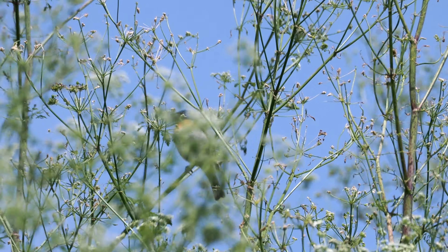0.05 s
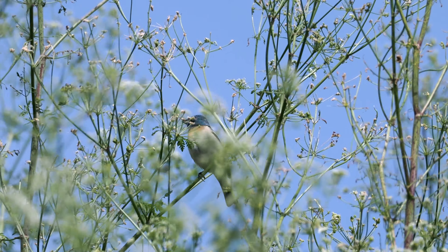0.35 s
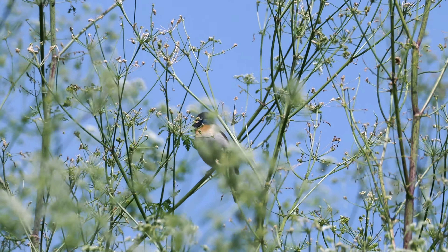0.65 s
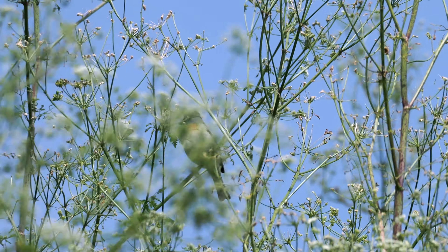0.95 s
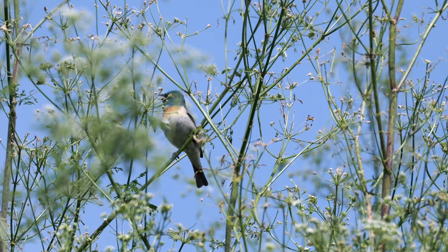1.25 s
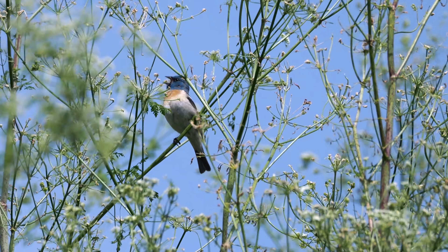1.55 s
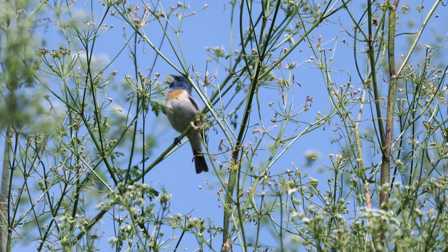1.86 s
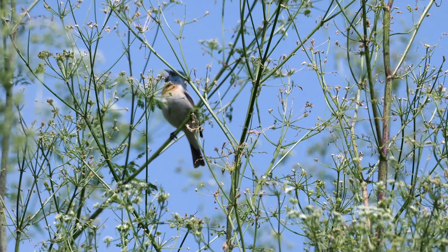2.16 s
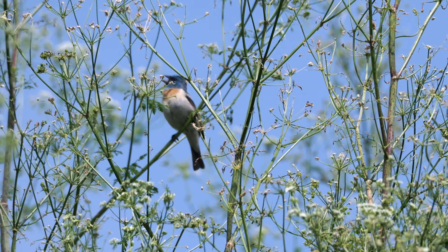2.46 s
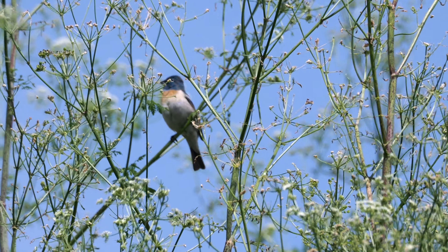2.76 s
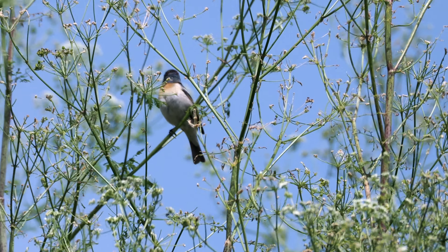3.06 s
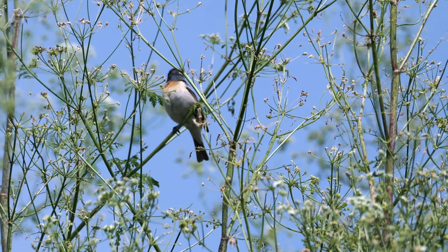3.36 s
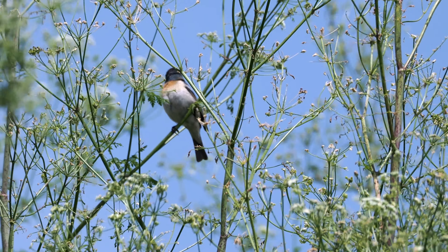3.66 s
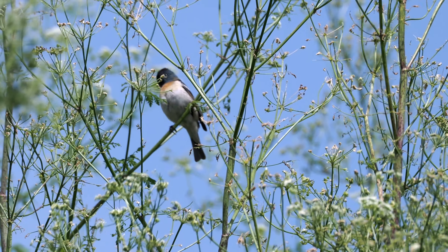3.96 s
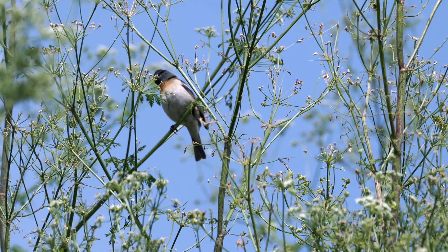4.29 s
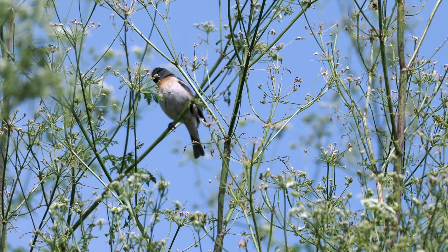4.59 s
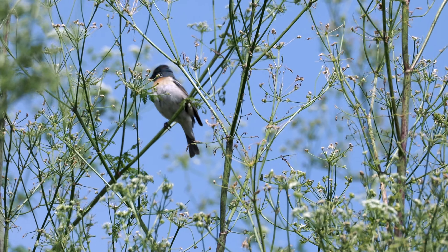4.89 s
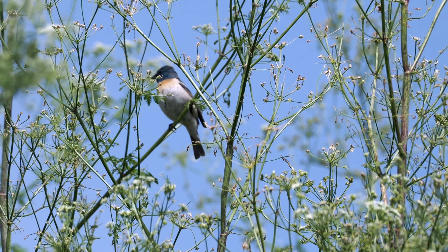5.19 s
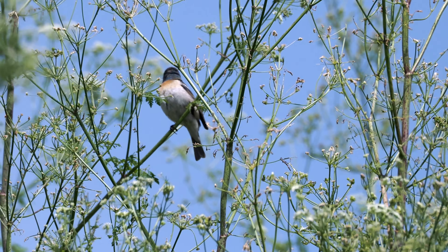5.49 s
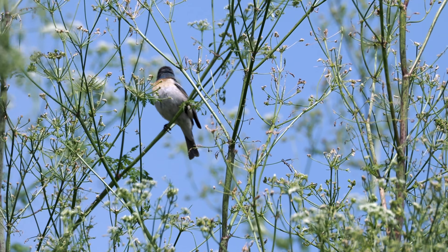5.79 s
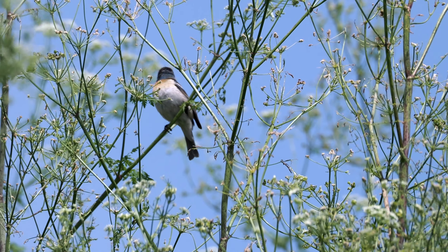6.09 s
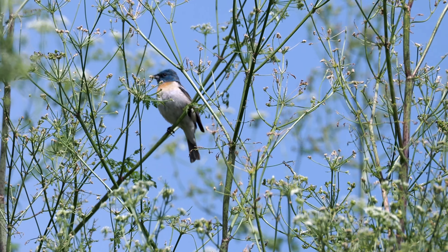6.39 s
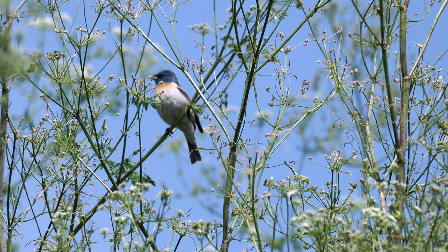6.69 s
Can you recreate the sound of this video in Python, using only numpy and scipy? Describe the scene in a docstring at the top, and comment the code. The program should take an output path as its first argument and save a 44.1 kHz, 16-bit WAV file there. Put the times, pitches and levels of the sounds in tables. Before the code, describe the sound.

Light wind rumbles on the microphone in an open, weedy place, with faint traffic and an engine humming far away. Thin distant bird whistles and a sharp chip lead into a nearby songbird's bright run of slurred notes, closed by a buzz and a brief rattle. Another chip, a few soft dry ticks and a dull distant thud follow. Faint birds keep calling as the wind gusts at the end.

```python
"""Bunting in tall weeds

A bunting's syrinx whistles paired slurs and arches, then a buzz and a short rattle. Other small birds
chip, whistle and trill further off; the stems scatter the notes. Faint dry ticks fall in and after the song.
Behind lie distant traffic, an engine's hum and one far thud. Light wind rumbles on the microphones
and gusts hardest at the end."""
import sys
import numpy as np
from scipy import signal
from scipy.fft import rfft, irfft, next_fast_len
from scipy.io import wavfile
from scipy.ndimage import uniform_filter1d

SR = 44100
rng = np.random.default_rng(int(sys.argv[2]) if len(sys.argv) > 2 else 0)


def transcribe(u):
    """Save the signal u as a 16-bit wav file named by the first command-line argument.

    u: samples, shape (n,) or (channels, n), limited to [-1, 1]; the rate is SR.
    q: integer samples, one column per channel.
    """
    v = np.clip(np.atleast_2d(u).T, -1, 1)
    q = np.round(v * 32767).astype(np.int16)
    wavfile.write(sys.argv[1], SR, q)


N = 297234
T = np.arange(N) / SR
FFT_SIZE = next_fast_len(N, True)
FREQS = np.fft.rfftfreq(FFT_SIZE, 1 / SR)


def undb(db):
    """Decibels to gain."""
    return 10 ** (np.asarray(db) / 20)


def curve(rows, x):
    """Two-column table, interpolated linearly at x."""
    return np.interp(x, *np.transpose(rows))


def unit(x):
    """Scale to rms 1."""
    return x / np.sqrt(np.mean(x ** 2))


def filtered(x, gain):
    """Apply a gain per frequency."""
    return irfft(rfft(x, FFT_SIZE) * gain, FFT_SIZE)[..., :N]


def colour(x, spectrum):
    """Filter by rows of f/Hz, gain/dB."""
    hz, db = np.transpose(spectrum)
    return filtered(x, undb(np.interp(np.log(FREQS + 1), np.log(hz), db)))


def noise(spectrum, channels=2):
    """Independent noises of one colour, rms 1."""
    return unit(colour(rng.standard_normal((channels, N)), spectrum))


def narrow(hz, width_hz, channels=1):
    """Gaussian band of noise, rms 1."""
    band = np.exp(-((FREQS - hz) / width_hz) ** 2 / 2)
    return unit(filtered(rng.standard_normal((channels, N)), band))


def walk(rate_hz):
    """Slow random drift, rms 1."""
    hold = int(SR / rate_hz)
    steps = np.repeat(rng.standard_normal(N // hold + 1), hold)
    return unit(uniform_filter1d(uniform_filter1d(steps, hold), hold)[:N])


def jitter(n, smooth_samples):
    """Fast random flutter, rms 1."""
    return unit(uniform_filter1d(rng.standard_normal(n), smooth_samples))


def pan(db):
    """Stereo gains for a left-minus-right level."""
    return undb(np.array([[1], [-1]]) * db / 2)


def add(track, start_s, x):
    """Mix x into track at start_s."""
    i = int(start_s * SR)
    track[..., i:i + x.shape[-1]] += x[..., :max(N - i, 0)]


def scatter(x, t60_s, db):
    """Dense weak echoes off stems and leaves, different at each microphone."""
    t = np.arange(SR // 2) / SR
    build_up = 1 - np.exp(-t / .0012)
    echoes = rng.standard_normal((2, len(t))) * np.exp(-np.log(1000) * t / t60_s) * build_up
    echoes /= np.sqrt(np.sum(echoes ** 2, axis=1, keepdims=True))
    return undb(db) * signal.fftconvolve(np.atleast_2d(x), echoes, axes=1)[:, :N]


# traffic, leaves and hiss: f/Hz, relative density/dB
AIR_SPECTRUM = [(30, 5.5), (110, 1.5), (250, -1), (390, -0.5), (500, -5), (1100, -6), (1450, -10.5),
                (1850, -22), (2300, -19.5), (2950, -17), (4200, -26.5), (8000, -27.5), (11300, -31.5),
                (15000, -31)]
# stereo width: f/Hz, side minus mid/dB
AIR_WIDTH = [(60, -41), (160, -12), (380, -8.5), (1300, -5), (2400, 1), (15000, 0.5)]
# traffic drone: f/Hz, width/Hz, rms level/dB
DRONE_BANDS = [(263.5, 7.6, -71.5), (386.2, 12.7, -68.5), (685, 80, -68), (1006, 20, -70.5)]


def traffic_and_leaves(mid_db=-54):
    """Far traffic and leaves: centred lows, wide hiss, a faint tonal drone."""
    mid, side = noise(AIR_SPECTRUM)
    side = colour(side, AIR_WIDTH)
    drone = sum(undb(db) * narrow(hz, width_hz) for hz, width_hz, db in DRONE_BANDS)
    return undb(mid_db) * np.array([mid + side, mid - side]) + drone


# engine hum: f/Hz, rms level/dB
ENGINE_LINES = [(129.5, -64), (157.7, -58.5)]


def engine(drift=0.00408, flutter_db=1.63):
    """Two low lines of a far engine, wavering on their way through the air."""
    hum = np.zeros(N)
    for hz, db in ENGINE_LINES:
        amplitude = np.sqrt(2) * undb(db + flutter_db * walk(8.3))
        phase = 2 * np.pi * np.cumsum(hz * (1 + drift * walk(9))) / SR
        hum += amplitude * np.sin(phase)
    return hum


# breeze: t/s, level/dB
BREEZE_LEVELS = [(0, -57), (.8, -57), (2, -62.5), (3.8, -65), (4.6, -53.5), (5.8, -57.5), (6.7, -56)]
# gusts: peak t/s, length/s, level/dB, L-R/dB
WIND_GUSTS = [(0.053, .08, -42, 4), (.21, 0.15, -45.5, 7.5), (.86, .06, -49.5, -3),
              (1.06, 0.067, -54.5, 19), (1.48, .07, -52, 8), (4.5, .06, -46, 16), (5.25, 0.063, -48.5, 16),
              (6.04, 0.049, -51, -12), (6.504, 0.12, -42.5, 14.5), (6.668, 0.058, -37, 21)]
# buffeting: f/Hz, relative density/dB
WIND_SPECTRUM = [(8, -18), (20, 8.5), (35, 9.5), (55, -18.5), (120, -10), (300, -50), (2000, -95)]


def wind():
    """Eddies buffet each microphone separately: a light breeze plus brief gusts."""
    power = undb(curve(BREEZE_LEVELS, T)) ** 2
    for peak_s, length_s, db, pan_db in WIND_GUSTS:
        bell = np.exp(-(2 * (T - peak_s) / length_s) ** 2)
        power = power + (undb(db) * pan(pan_db)) ** 2 * bell
    return noise(WIND_SPECTRUM) * np.sqrt(power)


# overtones: f/Hz, level re fundamental/dB
SYRINX_OVERTONES = [(7000, -31.5), (9000, -38), (11000, -29.5), (12500, -28.5), (14000, -26), (15500, -31)]


def syrinx(hz, db, harsh_db=0, waver=0.012, rasp_rad=0.45):
    """A bird's voice: a nearly pure, wavering tone with weak, raspy overtones."""
    wavering_hz = hz * (1 + waver * jitter(len(hz), 60))
    phase = 2 * np.pi * np.cumsum(wavering_hz) / SR
    rasp = rasp_rad * jitter(len(hz), 30)
    tone = np.sin(phase)
    for k in (2, 3):
        gain = undb(curve(SYRINX_OVERTONES, k * hz) + harsh_db) * (k * hz < SR / 2)
        tone += gain * np.sin(k * phase + rasp)
    return tone * undb(db) * signal.windows.tukey(len(hz), .08)


def swell_db(t, attack_s, release_s, depth_db=15.5):
    """Attack, hold and release of a note."""
    attack = np.maximum(1 - t / attack_s, 0)
    release = np.maximum(1 - (t[-1] - t) / release_s, 0)
    return -depth_db * (attack + release)


def calls(rows, settle, attack_share, release_share, harsh_db=0, waver=0.012):
    """Simple calls: the pitch leaves its start quickly and settles on its end."""
    track = np.zeros((2, N))
    for start_s, length_s, start_hz, end_hz, db, pan_db in rows:
        t = np.arange(int(length_s * SR)) / SR
        to_go = (np.exp(-settle * t / length_s) - np.exp(-settle)) / (1 - np.exp(-settle))
        hz = end_hz + (start_hz - end_hz) * to_go
        level_db = db + swell_db(t, attack_share * length_s, release_share * length_s)
        add(track, start_s, pan(pan_db) * syrinx(hz, level_db, harsh_db, waver))
    return track


# thin whistles: t/s, length/s, start f/Hz, end f/Hz, relative level/dB, L-R/dB
WHISTLE_CALLS = [ (.285, 0.055, 8750, 7850, -56.5, 5), (.541, .09, 8500, 7400, -51.5, 0),
                 (.825, 0.073, 8870, 7670, -54.5, 0), (.987, 0.078, 9200, 7880, -58, -2),
                 (1.086, .085, 6170, 5250, -58.5, 0), (4.05, .033, 6950, 7570, -64.5, -8),
                 (4.14, .061, 6500, 7100, -69, -7), (4.265, .046, 6300, 6900, -72, -7),
                 (5.335, .04, 6630, 7300, -69, -3), (5.591, .068, 6700, 7220, -57.5, -7),
                 (5.711, 0.05, 6700, 7000, -55, -6), (5.837, .06, 6530, 7120, -56.5, -5),
                 (5.955, 0.017, 6400, 6900, -61, -5), (6.097, 0.013, 5400, 7150, -59.5, -7),
                 (6.134, 0.014, 6260, 7600, -59, -5), (6.238, 0.014, 5640, 7100, -58, -4),
                 (6.29, .015, 6200, 7400, -64, -3)]


def far_whistles(gain_db=-3):
    """Birds deep in the weeds; much of their sound arrives scattered."""
    direct = calls(WHISTLE_CALLS, settle=3.2, attack_share=0.27, release_share=0.12)
    echoes = scatter(direct, t60_s=0.057, db=-2.5) + scatter(direct, t60_s=0.45, db=-4)
    return undb(gain_db) * (direct + echoes)


# sharp chips: t/s, length/s, start f/Hz, end f/Hz, level/dB, L-R/dB
CHIP_CALLS = [(.7275, 0.0084, 11100, 5550, -27, 2), (2.8810, .013, 10550, 6060, -28, 6)]


def chips():
    """A nearby bird's harsh downward sweeps, echoed by the stems."""
    direct = calls(CHIP_CALLS, settle=2.13, attack_share=0.57, release_share=0.5, harsh_db=9, waver=0.0087)
    return direct + scatter(direct, t60_s=.07, db=-2.5) + scatter(direct, t60_s=0.21, db=-7)


# trill: t/s, level/dB
TRILL_LEVELS = [(1.16, -83), (1.2, -68), (1.45, -65), (1.72, -66.5), (1.88, -80)]


def trill(flicker_db=0.3):
    """A distant thin trill, smeared by the thicket into a narrow band."""
    times_s, db = np.transpose(TRILL_LEVELS)
    envelope = np.interp(T, times_s, undb(db), left=0, right=0)
    return narrow(hz=7224, width_hz=270, channels=2) * envelope * undb(flicker_db * walk(70))


# gestures by name: attack/s, release/s, pitch path of (t/s, f/Hz)
GESTURES = { "hook": (0.024, 0.0065, [(0, 5360), (.02, 4800), (.041, 3680)]),
            "flick": (0.0026, 0.0063, [(0, 6120), (.004, 5360), (.012, 4060)]),
            "slur": (0.013, 0.011, [(0, 7520), (.011, 7360), (.057, 5450)]),
            "dip": (0.0015, 0.011, [(0, 7550), (.005, 4970), (.012, 3940), (.06, 3420), (.077, 2770)]),
            "arch": (0.008, 0.011, [(0, 2920), (.01, 4190), (.038, 5410), (.05, 5535), (.063, 5450),
            (.092, 4880)]), "wave": (0.01, 0.013, [(0, 4330), (.016, 4420), (.031, 5300), (.052, 5590),
            (.074, 4900), (.09, 4970)]), "tick": (0.016, 0.01, [(0, 5600), (.007, 8430), (.014, 7280),
            (.022, 6450), (.03, 6400)]), "bow": (0.042, 0.012, [(0, 3890), (.013, 3560), (.042, 4050),
            (.06, 5470), (.071, 5620), (.081, 5400), (.094, 4050), (.116, 2946)]),
            "rattle": (0.003, 0.0027, [(0, 3700), (.013, 4630), (.0185, 6260), (.023, 4470), (.03, 2960)]),
            "burr": (.004, 0.0043, [(0, 2600), (.007, 3280), (.017, 2650)]), }
# how loud each pitch of the song arrives at the microphones: f/Hz, gain/dB
LEVEL_BY_PITCH = [(3000, 0.5), (3500, 3), (3950, -5), (4700, 3), (5200, 0), (5550, 1), (6100, -5),
                  (6500, -9), (6900, -0.5), (7500, -11.5)]


def syllable(gesture, pitch_ratio, waver=0.0041, shimmer_db=1.12, sweep_loss_db=12, half_loss_hz_s=240000):
    """One syrinx gesture: muscles round its corners; it weakens while the pitch moves fast."""
    attack_s, release_s, path = GESTURES[gesture]
    t = np.arange(int(path[-1][0] * SR)) / SR
    hz = pitch_ratio * uniform_filter1d(curve(path, t), size=90, mode="nearest")
    sweep_hz_s = np.abs(np.gradient(hz)) * SR
    db = swell_db(t, attack_s, release_s) + curve(LEVEL_BY_PITCH, hz)
    db -= sweep_loss_db * sweep_hz_s / (sweep_hz_s + half_loss_hz_s)
    db += shimmer_db * jitter(len(t), 120)
    return syrinx(hz, db, waver=waver)


# whistled phrase: t/s, gesture, pitch ratio, gain/dB
PHRASE_NOTES = [ (1.233, "hook", 0.98, -56.5), (1.337, "hook", 0.99, -43.5), (1.442, "hook", 0.97, -36.5),
                (1.538, "slur", 0.997, -33.5), (1.634, "hook", 1.01, -32), (1.739, "slur", 1.003, -32.5),
                (1.831, "dip", 0.98, -36), (1.932, "arch", 1, -33.5), (2.056, "dip", 0.982, -35.5),
                (2.166, "wave", 1.011, -34), (2.29, "tick", .994, -25.5), (2.329, "bow", 1, -33)]


def phrase(flick_delay_s=.0415, flick_ratio=.96, flick_db=-4):
    """The bunting's whistled syllables; a quick flick ends each hook."""
    voice = np.zeros(N)
    for start_s, gesture, pitch_ratio, db in PHRASE_NOTES:
        add(voice, start_s, undb(db) * syllable(gesture, pitch_ratio))
        if gesture == "hook":
            flick = syllable("flick", flick_ratio * pitch_ratio)
            add(voice, start_s + flick_delay_s, undb(db + flick_db) * flick)
    return voice


def buzz(start_s=2.5155, scoops=7, rate_hz=96, low_hz=6830, swing_hz=2390, peak_db=-32.5, throb_db=25):
    """Fast scoops of pitch, each loudest at its bottom, swelling and fading as a whole."""
    turns = np.arange(int(scoops / rate_hz * SR)) / SR * rate_hz
    tension = 1 - np.abs(np.sin(np.pi * turns))
    arch_db = -9 * (2 * (turns / scoops - .4)) ** 2
    voice = np.zeros(N)
    add(voice, start_s, syrinx(low_hz + swing_hz * tension, peak_db + arch_db - throb_db * tension))
    return voice


# stroke pairs: t/s, gain/dB
RATTLE_PAIRS = [(2.625, -37.5), (2.74, -44)]


def rattle(spacing_s=0.041, burr_delay_s=0.014, burr_db=-8.5):
    """The song's close: paired strokes, a low burr under the first of each pair."""
    voice = np.zeros(N)
    for start_s, db in RATTLE_PAIRS:
        for stroke_s in (start_s, start_s + spacing_s):
            add(voice, stroke_s, undb(db) * syllable("rattle", pitch_ratio=1.02, waver=0.02))
        add(voice, start_s + burr_delay_s, undb(db + burr_db) * syllable("burr", pitch_ratio=0.98))
    return voice


# bunting at the right microphone: f/Hz, R-L/dB
RIGHT_RESPONSE = [(3600, 2), (4750, 1.5), (5100, -2), (5500, 10.5), (6000, 10), (6800, 8.5), (7600, 7.5)]


def bunting(left_lag_s=.000042):
    """The near singer, slightly right, with echoes from close stems and the wider thicket."""
    voice = phrase() + buzz() + rattle()
    left = filtered(voice, np.exp(-2j * np.pi * FREQS * left_lag_s))
    direct = np.array([left, colour(voice, RIGHT_RESPONSE)])
    stems = scatter(direct.mean(axis=0), t60_s=0.081, db=-6.5)
    thicket = scatter(voice, t60_s=0.3, db=-14.5)
    return direct + stems + thicket


# ticks: t/s, level/dB, knock share/0-1
TICK_EVENTS = [(1.439, -52.5, 0.94), (1.625, -49, 0.4), (2.825, -61, 0.1), (3.028, -55.5, 0.06),
               (3.094, -64, 0.1), (3.293, -54, 0.38), (3.361, -62, 0.14)]
# dry click: f/Hz, relative density/dB
CLICK_SPECTRUM = [(1500, -30), (2500, 1.5), (3500, -1), (4200, -22), (9000, -24)]


def ticks(rise_s=0.0038):
    """Soft dry ticks, centred, some with a duller knock."""
    t = np.arange(SR // 20) / SR
    pulse = t / rise_s * np.exp(1 - t / rise_s)
    click, knock = np.zeros((2, N))
    for start_s, db, knock_share in TICK_EVENTS:
        add(click, start_s, undb(db) * (1 - knock_share) * pulse)
        add(knock, start_s, undb(db) * knock_share * pulse)
    return click * noise(CLICK_SPECTRUM, channels=1) + knock * narrow(hz=1410, width_hz=350)


# thud: f/Hz, relative density/dB
THUD_SPECTRUM = [(120, -27), (350, 5), (600, 8), (800, 0), (1100, 4), (1350, -4), (1750, -14.5),
                 (2200, -47)]


def thud(start_s=4.043, rise_s=.02, t60_s=0.77, gain_db=-41.5, side_db=-6):
    """A far bang, dulled by distance and drawn out by the land."""
    age_s = np.maximum(T - start_s, 0)
    envelope = np.minimum(age_s / rise_s, 1) * np.exp(-np.log(1000) * age_s / t60_s)
    mid, side = noise(THUD_SPECTRUM)
    return undb(gain_db) * envelope * (mid + undb(side_db) * np.array([side, -side]))


def scene():
    """Birds in front, the land behind, wind on the microphones."""
    background = traffic_and_leaves() + engine() + wind()
    return background + far_whistles() + chips() + trill() + bunting() + ticks() + thud()


def record(dry):
    """Steep low-pass at 15650 Hz."""
    return signal.sosfilt(signal.ellip(10, .1, 70, 15650, fs=SR, output="sos"), dry)


dry = scene()
out = record(dry)
transcribe(out)
```